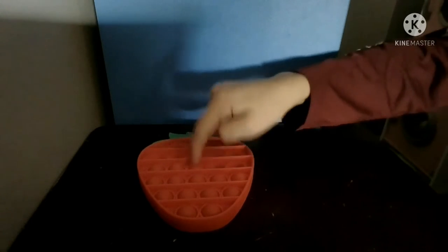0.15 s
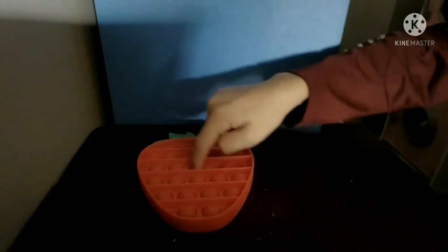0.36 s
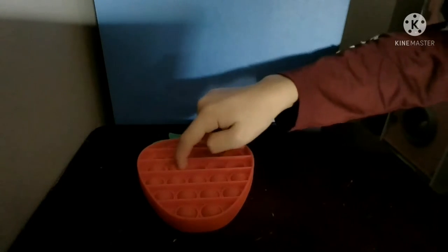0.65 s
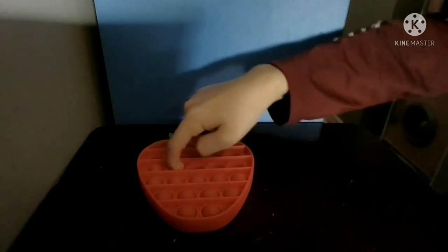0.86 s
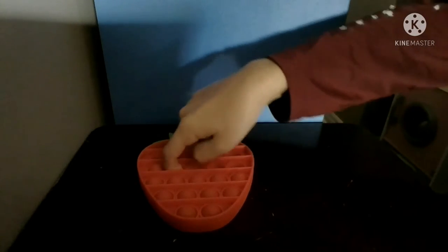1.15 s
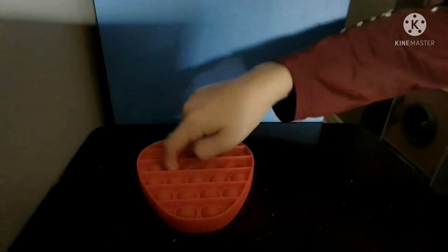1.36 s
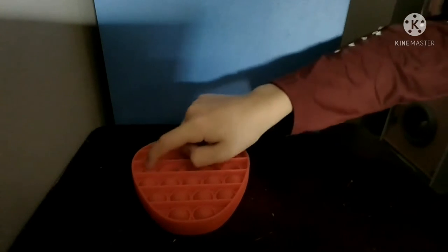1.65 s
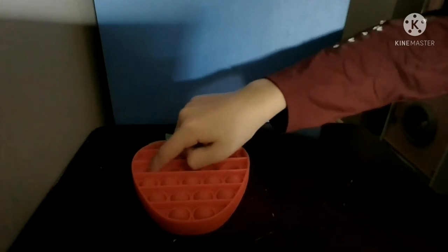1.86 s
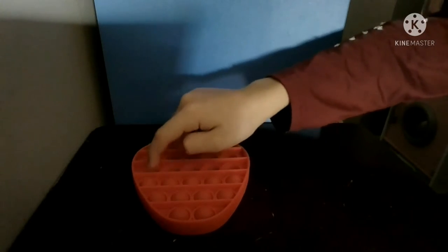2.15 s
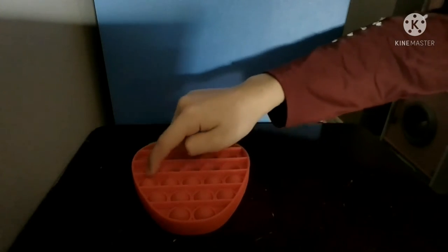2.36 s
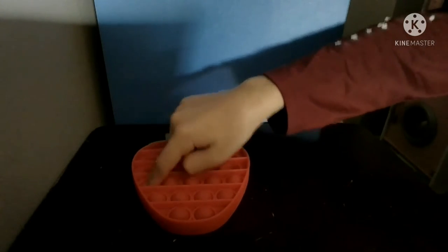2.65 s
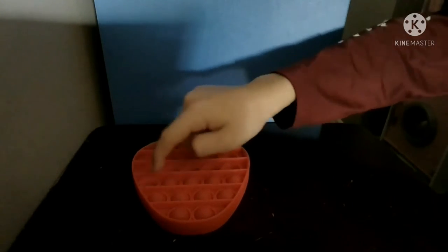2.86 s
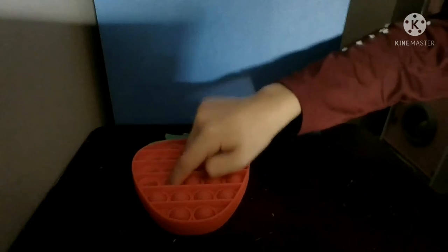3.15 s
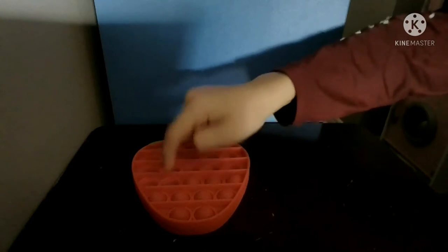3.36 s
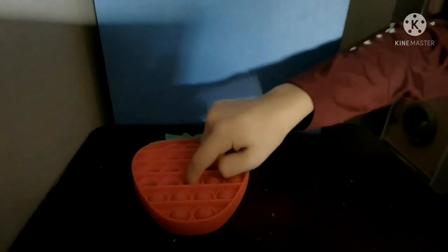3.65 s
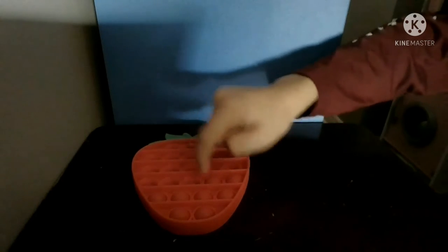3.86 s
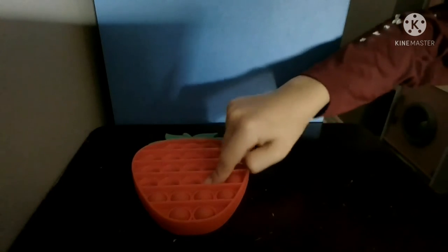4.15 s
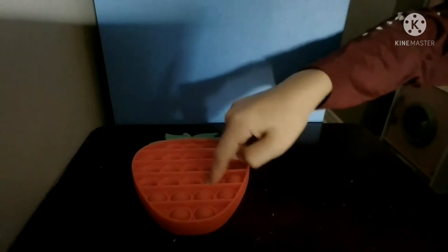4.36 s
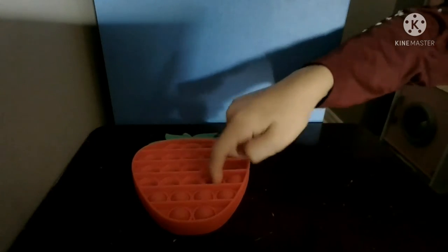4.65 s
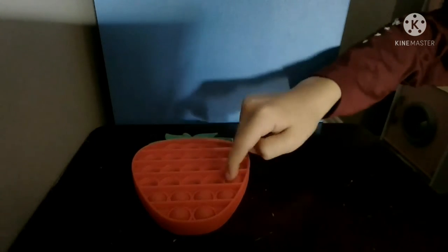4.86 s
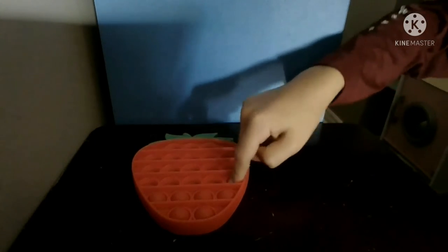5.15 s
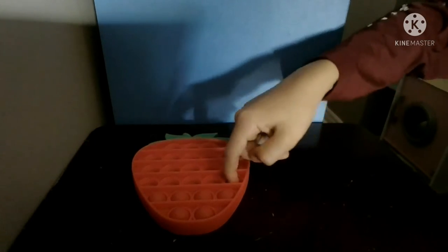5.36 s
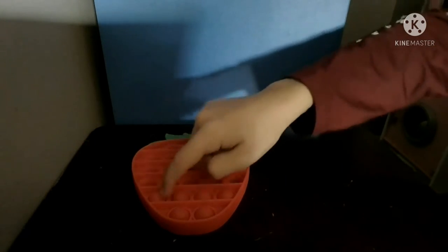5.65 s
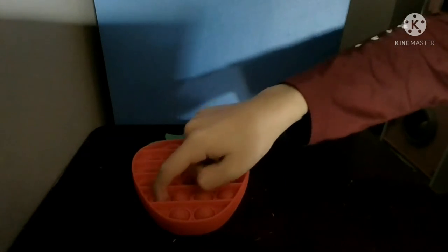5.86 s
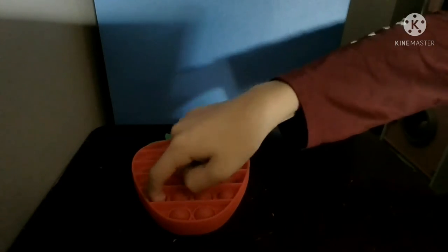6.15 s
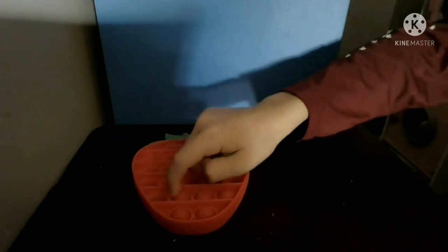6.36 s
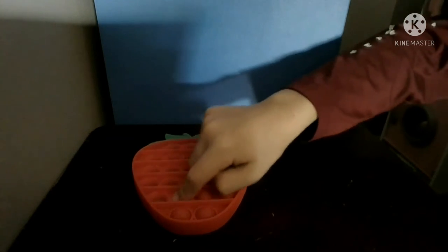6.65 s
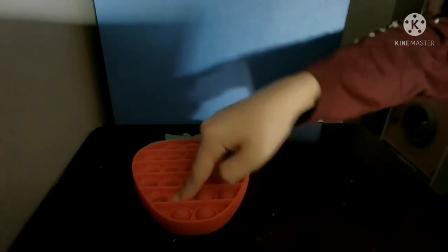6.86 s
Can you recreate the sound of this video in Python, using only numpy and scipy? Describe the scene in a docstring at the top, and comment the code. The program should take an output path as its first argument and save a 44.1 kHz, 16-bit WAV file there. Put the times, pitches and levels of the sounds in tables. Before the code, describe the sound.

Close to the microphone in a small room, silicone bubbles snap through one by one under a finger. A quick cluster of hollow pops opens, followed by scattered single pops, some sharp and loud, others dull and faint. Thin ticks, soft knocks and crisp, slightly squeaky skin rubs fill the gaps, and the table booms faintly beneath the toy. A low hum, rumble and hiss continue throughout.

```python
"""Short, hollow pops: a fingertip pushes in the bubbles of a silicone toy on a table in a small room.
Each bubble is a dome that snaps through, rings briefly and thumps the table.
Between pops the finger taps, rubs and drags on the rubber. A low hum, rumble and hiss lie underneath.
The loudest pops overload the close microphone."""
import sys
import numpy as np
from scipy import signal
from scipy.fft import rfft, irfft
from scipy.io import wavfile

SR = 44100
rng = np.random.default_rng(int(sys.argv[2]) if len(sys.argv) > 2 else 0)


def waveform_to_disk(signal):
    """Save audio, clipped to [-1, 1], as 16-bit WAV at the path in sys.argv[1]."""
    frames = np.transpose(np.atleast_2d(signal))
    scaled = np.clip(frames, -1, 1) * 32767
    samples = np.round(scaled).astype(np.int16)
    wavfile.write(sys.argv[1], SR, samples)


N = 309130
TIME = np.arange(N) / SR

# Domes giving way: start_s, knock_db, knock_top_hz, dome_pitch_hz, dome_db, thump_db, thump_sharpness_hz
POPS = [(0.0168, -1, 2170, 1310, -7, -18, 124), (0.275, -11, 930, 1290, -12.5, -27, 150),
        (0.3119, -14.5, 1520, 1340, -16, -29, 124), (0.3466, -2.5, 2500, 1300, -2, -21, 129),
        (1.2594, -5.5, 2270, 1340, 4, -32, 138), (1.9229, 0.5, 850, 2820, -6.5, -31, 190),
        (1.9351, -7.5, 2140, 2940, -10.5, -14, 263), (2.6501, -13, 1210, 1386, -14.5, -24, 190),
        (2.6750, -17, 694, 710, -35, -19.5, 180), (3.2633, -3.5, 3950, 2615, 7.5, -13.5, 226),
        (3.2658, 1.5, 2060, 1630, -0.5, -23.5, 700), (3.6929, -4.5, 2880, 1560, -17, -21.5, 360),
        (3.7003, 1.5, 2260, 1774, 6, -12.5, 595), (4.4701, -18.5, 1110, 1110, -52, -27, 109),
        (4.531, -27, 700, 1100, -41, -24.5, 87.5), (5.0670, -27, 1010, 1310, -34, -27, 102),
        (5.3160, -8, 815, 1650, -23.5, -18.5, 99), (5.8898, -22, 1700, 1640, -22.5, -39, 219),
        (6.107, 3, 1400, 1580, 5, -24.5, 520), (6.428, -31, 1500, 1500, -34, -25.5, 108)]
# The fingertip landing on the rubber: start_s, tick_db, tick_pitch_hz, finger_pad_db
TAPS = [(0.1346, -26, 1360, -44.5), (0.162, -22, 1430, -41.5), (0.27, -28, 1800, -45),
        (0.4606, -28, 1420, -52), (0.604, -28.5, 1330, -31.5), (1.465, -24, 1520, -31),
        (1.492, -22.5, 1400, -30.5), (1.5423, -35, 1390, -38.5), (1.6936, -18, 1405, -31),
        (2.1154, -29, 2760, -46), (2.796, -29, 1440, -32.5), (3.1069, -36, 2600, -39.5),
        (3.5986, -24, 1360, -26.5), (3.8431, -29, 1360, -33.5), (3.9994, -27, 1350, -27.5),
        (4.1954, -26, 2900, -33), (4.8778, -32.5, 1170, -44), (4.9213, -27.5, 1610, -43),
        (5.4737, -24, 2130, -37.5), (5.5077, -30, 2010, -32.5), (5.7032, -30.5, 1290, -35),
        (5.848, -34, 2250, -46), (6.2808, -33.5, 2150, -40), (6.5044, -32, 1330, -42.5),
        (6.8859, -39.5, 1350, -40.5)]


def from_db(db):
    """Turn decibels into a number to multiply a sound by."""
    return 10 ** (np.asarray(db) / 20)


def at_hz(points, hz, column=1):
    """Read a table at any frequency, blending between its rows on a pitch scale."""
    points = np.array(points)
    return np.interp(np.log(np.maximum(hz, 1)), np.log(points[:, 0]), points[:, column])


def filtered(x, hz, kind, order=2):
    """Keep the low part, the high part or a band of a sound."""
    sections = signal.butter(order, np.clip(hz, 10, .45 * SR), kind, fs=SR, output="sos")
    return signal.sosfilt(sections, x)


def coloured(noise, spectrum):
    """Shape the bass and treble of a noise, then set its average strength (rms) to 1."""
    hz = np.arange(N // 2 + 1) * SR / N
    shaped = irfft(rfft(noise) * from_db(at_hz(spectrum, hz)), N)
    return shaped / np.std(shaped)


def ring(hz, fade_s, size=4096):
    """One tone of a struck object. Here and below, a fade time is the time to fall by 60 dB."""
    t = TIME[:size]
    return np.sin(2 * np.pi * hz * t) * np.exp(-np.log(1000) * t / fade_s)


def add(track, start_s, sound):
    """Mix a sound into a track at the given time."""
    start = max(round(start_s * SR), 0)
    track[start:start + len(sound)] += sound[:N - start]


def background(hiss_db=-45, rumble_db=-41.5, hum_db=-46, hum_hz=59.2, waver=0.62):
    """An even hiss, a low rumble and a hum whose loudness wavers."""
    # The tone of the hiss: frequency_hz, level_db
    hiss_colour = [(59, -36), (100, 4.5), (173, 0), (248, -3), (477, -9.5), (508, -8.5), (682, -11),
                   (843, -11.5), (1460, -14), (1590, -15), (2040, -16), (2370, -18.5), (15500, -20.5)]
    hiss = coloured(rng.standard_normal(N), hiss_colour)
    hiss /= np.std(filtered(hiss, 150, "high", order=4))   # hiss_db sets the part above 150 Hz
    rumble = filtered(rng.standard_normal(N + SR), [32.4, 70], "band")[SR:]
    sway = np.interp(TIME, np.linspace(0, TIME[-1], 30), rng.standard_normal(30))
    hum = np.sqrt(2) * np.sin(2 * np.pi * hum_hz * TIME) * (1 + waver * sway)
    return from_db(hiss_db) * hiss + from_db(rumble_db) * rumble / np.std(rumble) + from_db(hum_db) * hum


def room(x, build_s=0.0024, gain_db=-8):
    """Many reflections blur into a tail that builds quickly and lasts longest in the bass."""
    # The room's tail: frequency_hz, level_db, fade_s
    bands = [(150, -1, 0.3), (413, -8.5, 0.22), (670, -8, 0.17), (900, -1, 0.15), (1700, -9, 0.21),
             (2600, -8.5, 0.19), (4500, -10, 0.17), (7000, -11, 0.19), (14000, -13, 0.19)]
    t = TIME[:SR // 3]
    noise = rng.standard_normal((2, len(t)))
    edges_hz = np.geomspace(140, 16000, 15)
    tail = np.zeros(len(t))
    for k, (low, high) in enumerate(zip(edges_hz, edges_hz[1:])):
        hz = np.sqrt(low * high)
        fade = np.exp(-np.log(1000) * t / at_hz(bands, hz, column=2))
        tail += from_db(at_hz(bands, hz)) * fade * filtered(noise[k % 2], [low, high], "band")
    tail *= 1 - np.exp(-(t / build_s) ** 2)
    return from_db(gain_db) * signal.fftconvolve(x, tail / np.sqrt(SR * build_s))[:N]


def echoes(x, top_hz=3000):
    """The wall and the screen behind the toy send back quick, dull copies of a sound."""
    # Bounces off nearby surfaces: delay_s, level_db
    bounces = [(.0046, -22.5), (.0094, -20), (0.0111, -26), (0.0128, -25)]
    out = np.zeros(N)
    for delay_s, db in bounces:
        add(out, delay_s, from_db(db) * x)
    return filtered(out, top_hz, "low")


def skin_slips(per_s):
    """Skin sticks and slips on silicone, making tiny clicks at random times."""
    return rng.standard_normal(N) * (rng.random(N) < per_s / SR)


def drags(slips_per_s=1500, band_ratio=1.56, half_length_s=0.026):
    """The finger slides to the next bubble: a dull judder when pressed hard, otherwise a light brush."""
    # Soft slides: peak_s, level_db, centre_hz
    slides = [(1.482, -30.5, 320), (1.677, -43, 2600), (4.348, -48.5, 2370), (4.915, -48.5, 2400),
              (5.03, -51.5, 3140), (5.515, -44.5, 2020), (6.447, -42, 487)]
    out = np.zeros(N)
    for peak_s, db, centre_hz in slides:
        near = np.abs(TIME - peak_s) < 3 * half_length_s
        slips = skin_slips(slips_per_s)[near]
        brush = filtered(slips, [centre_hz / band_ratio, centre_hz * band_ratio], "band")
        swell = np.exp(-((TIME[near] - peak_s) / half_length_s) ** 2)
        out[near] += from_db(db) * swell * brush / (np.std(brush) + 1e-12)
    return out


def rubs(slips_per_s=4000, usual_s=0.0059, usual_db=-28.5, halving_db=10.5, sudden_s=0.01):
    """Tiny slips crowd into a crisp hiss with a faint squeak; short rubs start abruptly, long ones swell."""
    # Skin rubbing the silicone: peak_s, level_db, squeak_hz
    strokes = [(0.133, -35, 9200), (0.164, -33.5, 3000), (0.498, -36.5, 6950), (1.433, -13.5, 8500),
               (1.4546, -23, 9500), (1.474, -32, 6300), (1.694, -22, 6860), (2.118, -24.5, 9650),
               (2.674, -33.5, 5000), (2.8074, -25.5, 8750), (2.824, -30.5, 7000), (3.4004, -26.5, 10200),
               (3.853, -32.5, 6960), (4.196, -35.5, 5500), (4.486, -31, 7660), (4.553, -37, 8500),
               (4.752, -34, 7160), (4.947, -41.5, 7160), (5.112, -38, 11300), (5.316, -19, 7000),
               (6.282, -37.5, 6000), (6.427, -35.5, 7600)]
    # The tone of the rubbing: frequency_hz, level_db
    rub_colour = [(300, 11), (1500, 4.5), (2800, 5.5), (4500, -3), (7000, 4), (9000, 2), (12000, 3),
                  (15500, 1)]
    hiss = coloured(skin_slips(slips_per_s), rub_colour)
    out = np.zeros(N)
    for peak_s, db, squeak_hz in strokes:
        # The harder the skin sticks, the more suddenly it lets go: louder rubs are shorter.
        length_s = usual_s * 2 ** ((usual_db - db) / halving_db)
        age = (TIME - peak_s) / length_s
        near = np.abs(age) < 10
        rise_speed = 1 + sudden_s / length_s
        pressure = np.exp(-np.maximum(age[near], -age[near] * rise_speed))
        squeak = signal.lfilter(*signal.iirpeak(squeak_hz, Q=7, fs=SR), hiss[near])
        rub = hiss[near] + 1.8 * squeak
        out[near] += from_db(db) * pressure * rub / np.std(rub)
    return out


def toy_knock():
    """One blow makes the toy ring; where it lands shifts the balance of the tones a little."""
    # Tones of the toy and the air pocket under it: pitch_hz, level_db, fade_s
    tones = [(370, -4.5, 0.017), (579, -1.5, 0.014), (730, -26.5, 0.038), (977, -5, 0.018),
             (1374, -1, 0.021), (1650, -14, 0.032), (2085, 2, 0.0071), (2225, -13.5, 0.019),
             (2880, -4.5, 0.019), (4200, -16, 0.012)]
    return sum(from_db(db + rng.standard_normal()) * ring(hz, fade_s) for hz, db, fade_s in tones)


def taps(tick_gain_db=-1, pad_gain_db=6, band_ratio=1.315, scuff_s=0.0065, pad_lag_s=0.00212):
    """A light blow and a brief scuff give a thin tick, then the finger pad lands with a dull knock."""
    out, t = np.zeros(N), TIME[:4096]
    for start_s, tick_db, tick_hz, pad_db in TAPS:
        scuff = 0.23 * rng.standard_normal(len(t)) * np.exp(-t / scuff_s)
        force = signal.unit_impulse(len(t)) + scuff
        tick = filtered(force, [tick_hz / band_ratio, tick_hz * band_ratio], "band", order=1)
        tick = filtered(tick, [900, 5500], "band")
        tick += 0.093 * ring(tick_hz, fade_s=0.03)   # the tight dome rings briefly
        knock = signal.fftconvolve(force, toy_knock())[:len(t)]
        pad = filtered(knock, [230, 650], "band")
        add(out, start_s, from_db(tick_db + tick_gain_db) * tick / np.abs(tick).max())
        add(out, start_s + pad_lag_s, from_db(pad_db + pad_gain_db) * pad / np.abs(pad).max())
    return out


def table_thumps(tap_gain_db=-6, tap_sharpness_hz=304):
    """With each pop or tap the finger sets the table booming; a soft blow wakes only its lowest tones."""
    # Tones of the table: pitch_hz, level_db, fade_s
    tones = [(81.96, 2, 0.46), (96.4, -15.5, 2.1), (145.6, 0, 0.23), (195, 5, 0.045), (225, -7, 0.13),
             (248.5, -15.5, 0.41), (321.7, -7, 0.18)]
    thumps = [(start_s, db, sharpness_hz) for start_s, *_, db, sharpness_hz in POPS]
    thumps += [(start_s, pad_db + tap_gain_db, tap_sharpness_hz) for start_s, *_, pad_db in TAPS]
    blows = np.zeros(N)
    for start_s, db, sharpness_hz in thumps:
        add(blows, start_s, from_db(db) * filtered(signal.unit_impulse(4096), sharpness_hz, "low"))
    boom = sum(from_db(db) * ring(hz, fade_s, size=N) for hz, db, fade_s in tones)
    return filtered(signal.fftconvolve(blows, boom)[:N], [50, 700], "band")


def pops(sealed_hz=236, leak_hz=214, fizz_s=0.0012, fizz_db_per_octave=14.5, usual_top_hz=2000,
         pulse_s=0.00071, pulse_gain_db=5):
    """Each dome snaps through, knocks the toy and rings; its first pulse spreads into the room."""
    direct, tails, t = np.zeros(N), np.zeros(N), TIME[:4096]
    for start_s, knock_db, top_hz, dome_hz, dome_db, *_ in POPS:
        knock = filtered(toy_knock(), top_hz, "low", order=4)   # a faster snap reaches higher tones
        # A freely ringing dome lifts the rim; air leaks under it and takes the bass away.
        knock = filtered(knock, sealed_hz + leak_hz * from_db(dome_db), "high")
        dome = filtered(ring(dome_hz, fade_s=0.016), 1.68 * dome_hz, "low", order=4)
        pop = -from_db(knock_db) * knock - from_db(dome_db) * dome
        # A brief burst of treble fizz on each pop, louder on brighter pops.
        fizz_db = knock_db - 20 + fizz_db_per_octave * np.log2(top_hz / usual_top_hz)
        fizz = filtered(rng.standard_normal(len(t)), [3000, 13000], "band")
        fizz *= from_db(fizz_db) * t / fizz_s * np.exp(1 - t / fizz_s)
        first_pulse = from_db(pulse_gain_db) * pop * np.exp(-t / pulse_s) + fizz
        add(direct, start_s, pop + fizz)
        add(tails, start_s, room(first_pulse))   # each dome sits at its own spot, so has its own tail
    return direct + echoes(direct) + tails


def scene(touch_room_db=-2):
    """Mix the finger's touches, the pops, the table and the background into one channel."""
    touches = taps() + rubs() + drags()
    touches = touches + echoes(touches) + from_db(touch_room_db) * room(touches)
    return (pops() + touches + table_thumps() + background())[None]


def record(dry, overload=1, top_hz=15700):
    """The overloaded microphone flattens the loudest peaks, then the highest treble is cut."""
    clipped = np.clip(dry, -overload, overload)
    treble_cut = signal.ellip(10, .1, 70, top_hz, fs=SR, output="sos")
    return signal.sosfilt(treble_cut, clipped)


dry = scene()
out = record(dry)
waveform_to_disk(out)
```